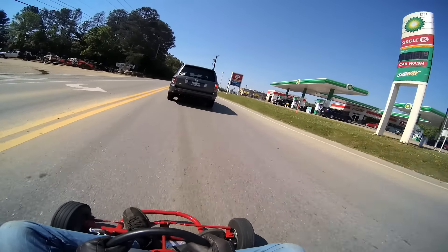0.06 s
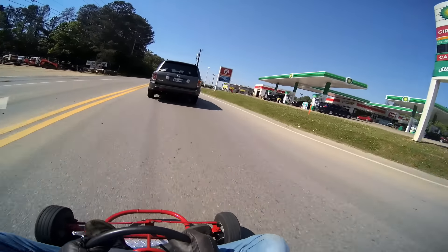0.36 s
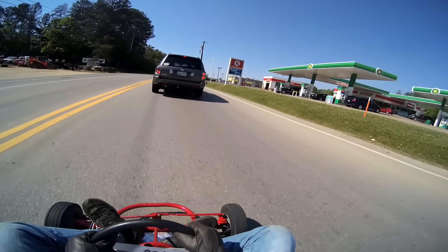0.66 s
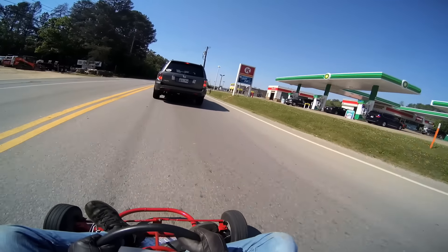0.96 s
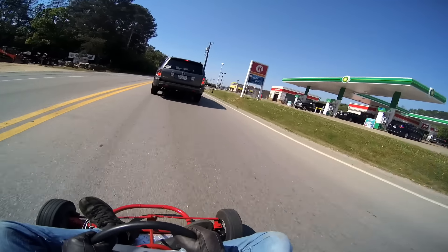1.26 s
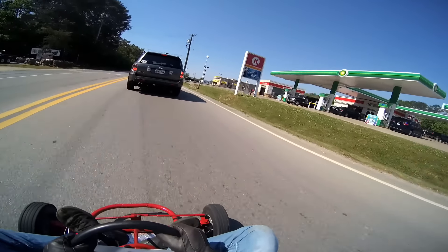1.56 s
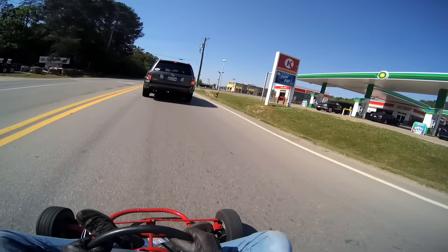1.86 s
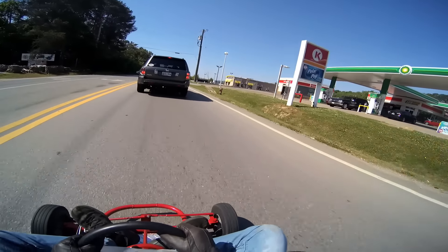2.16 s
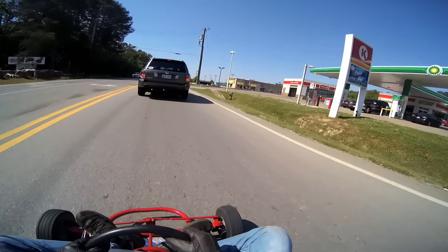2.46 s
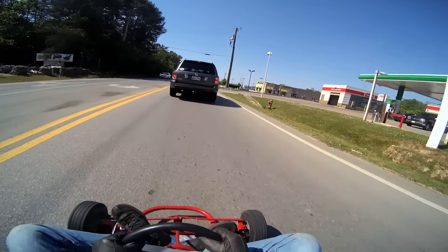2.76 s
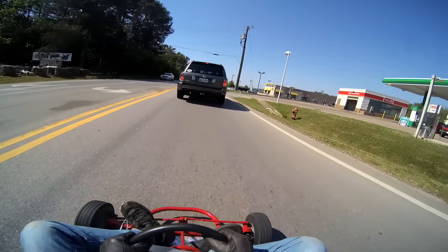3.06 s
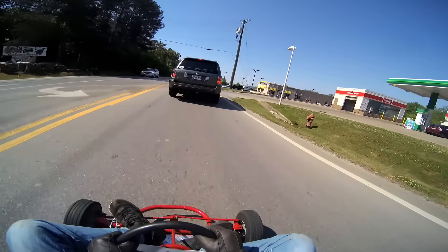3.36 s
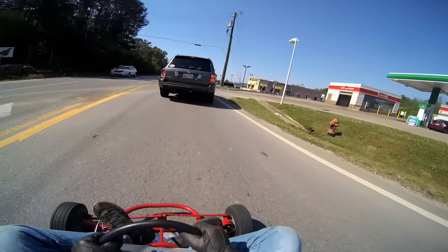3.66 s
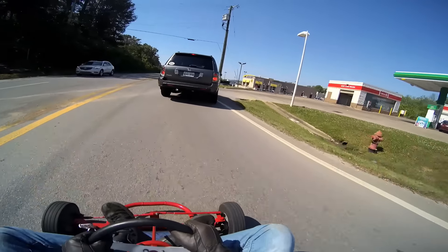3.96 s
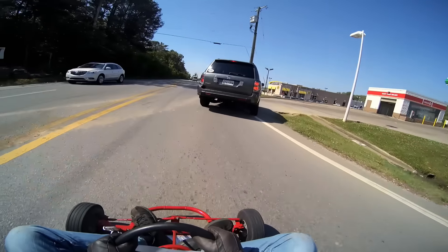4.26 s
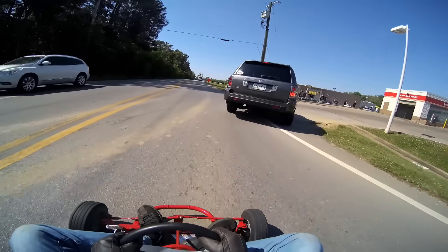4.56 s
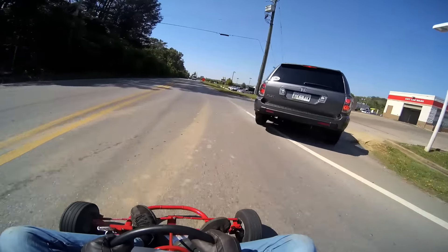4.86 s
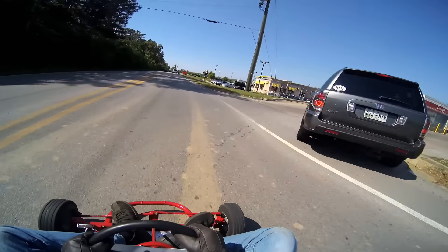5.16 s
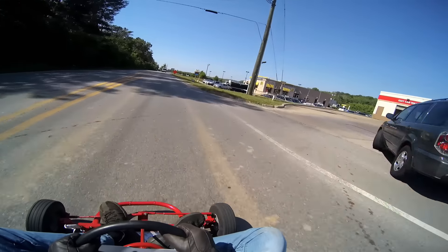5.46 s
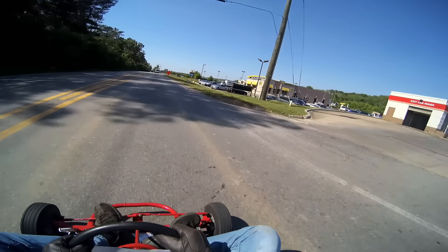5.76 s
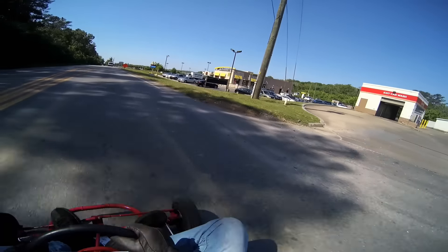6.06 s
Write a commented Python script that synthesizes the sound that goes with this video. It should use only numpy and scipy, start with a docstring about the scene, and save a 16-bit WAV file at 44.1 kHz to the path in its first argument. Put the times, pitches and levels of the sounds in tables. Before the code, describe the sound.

Heard from the driver's seat, a single-cylinder go-kart slows, sputtering and clattering, then opens up into a hard, hissing putter.

```python
"""The exhaust of a single-cylinder four-stroke go-kart, heard from a plastic case worn by the driver.
Coasting with the throttle shut, the revs sink and stray charges pop unevenly in the muffler. The drive
rattles as it takes up load; then every firing sends a pressure front and a bark of gas down the pipe.
Engine clatter, gear whine, the hiss of intake, chain and tyres, a low hum and a little wind run beneath.
Spectral peaks and dips colour the cracks and rushing noises, which reach two microphone ports."""
import sys
import numpy as np
from scipy import signal
from scipy.fft import rfft, irfft
from scipy.io import wavfile

SR = 44100
rng = np.random.default_rng(int(sys.argv[2]) if len(sys.argv) > 2 else 0)


def master(y):
    """Save y as 16-bit WAV."""
    cut = np.clip(np.atleast_2d(y).T, -1, 1)
    pcm = np.round(cut * 32767)  # scale
    wavfile.write(sys.argv[1], SR, pcm.astype(np.int16))


N = 269010
TIME = np.arange(N) / SR
CRUISE_HZ, CUTOFF_HZ = 20, 15300
CLUTCH_SLIPS_S, CLUTCH_BITES_S = 2.84, 4.05

# Engine speed, at two crank turns per firing: time_s, firing_rate_hz
FIRING_RATE = [(0.0, 25.608), (0.747, 24.031), (1.563, 20.607), (3.257, 16.983), (3.487, 15.762),
               (3.739, 16.191), (4.211, 19.534), (4.345, 21.701), (4.713, 21.356), (4.951, 21.528),
               (5.623, 21.116), (6.1, 22.42)]
# Throttle position: time_s, opening_fraction
THROTTLE_OPENING = [(0, .11), (4.1, .16), (4.23, .78), (4.38, 1), (4.6, .91), (4.95, 1)]
# Air drawn through the carburettor: time_s, strength_fraction
AIRFLOW = [(4.29, 0), (4.34, .68), (5.0, 1), (6.1, .15)]
# Level laws of exhaust, clatter, hiss and low throb:
# cruise_db, revs_db_per_octave, full_throttle_db, pulling_db_per_s, slack_loss_db
EXHAUST_LEVEL = (-42.5, 12, 8, 1.94, 14)
CLATTER_LEVEL = (-42, 6.5, 1.5, 2, 3)
HISS_LEVEL = (-51, 4, -4.5, 1.5, 6.5)
THROB_LEVEL = (-62, 10, 2.5, 3.5, 9)

# Firings that burn harder or softer than their neighbours: time_s, extra_db
UNEVEN_FIRINGS = [(4.237, 2), (4.286, 4), (4.333, 3), (4.426, 4), (4.472, -3), (4.658, -3), (4.751, 1.5),
                  (4.798, 2), (4.845, 2), (4.938, 4), (4.984, 4), (5.171, -1.5), (5.218, 5), (5.452, 2),
                  (5.548, -3), (5.595, 4), (5.689, 2.5), (5.828, 2.5), (5.92, -2), (6.011, 2)]
# The pressure front and its reflections in the pipe: delay_s, amplitude_ratio
PIPE_ECHOES = [(0, 0.68), (.0009, 0.24), (.0019, 0.23)]
# The uneven pops and thuds of the coasting engine, loud and faint:
# start_s, relative_bark_db, relative_boom_db, relative_thud_db
COASTING_POPS = [(0.013, -31, -38, -45), (0.131, -33, -47, -30.5), (0.174, -23, -68, -55),
                 (0.212, -27, -61, -55), (0.336, -25.5, -60, -55), (0.368, -30, -45, -30.5),
                 (0.409, -23, -55, -55), (0.451, -34, -61, -57), (0.534, -27, -55, -55),
                 (0.57, -23.5, -35.5, -31), (0.616, -27, -52, -50), (0.655, -24, -39, -32),
                 (0.785, -30, -34.5, -30), (0.83, -30, -54, -53), (0.867, -29, -59, -55),
                 (0.954, -26, -39, -38), (1.034, -22, -34, -30), (1.083, -26.5, -62, -55),
                 (1.122, -21.5, -37, -40), (1.172, -26.5, -47, -55), (1.22, -30, -44, -55),
                 (1.26, -39, -35, -39), (1.306, -23.5, -43, -50), (1.352, -25, -35.5, -33),
                 (1.445, -27, -31, -52), (1.501, -26, -46, -55), (1.542, -34, -35.5, -35),
                 (1.688, -38, -35, -55), (1.735, -27, -41, -55), (1.785, -30, -34, -45),
                 (1.886, -27, -35.5, -54), (1.988, -22, -35, -49), (2.041, -34, -36, -46),
                 (2.089, -28, -47, -52), (2.137, -31.5, -38, -52), (2.196, -31.5, -40, -52),
                 (2.249, -49, -41, -38), (2.301, -36, -43, -52), (2.404, -38, -39, -44),
                 (2.567, -36, -37, -34), (2.62, -55, -36, -52), (2.676, -47, -41.5, -54),
                 (2.787, -46, -39, -49), (2.844, -46, -37, -58), (2.898, -46, -38, -54),
                 (2.956, -32.5, -39, -57), (3.013, -34.5, -39, -59), (3.069, -49, -41, -51),
                 (3.185, -37, -37.5, -56), (3.243, -48, -49, -34.5), (3.301, -49, -53, -57),
                 (3.362, -36, -43, -44), (3.426, -34, -43, -64), (3.488, -32, -42, -55),
                 (3.551, -38, -47, -58), (3.617, -49, -41, -50), (3.68, -34, -54, -45),
                 (3.746, -55, -43, -43), (3.813, -37, -48, -42), (3.877, -39, -52, -36),
                 (3.945, -33, -49, -56), (4.01, -49, -56, -49), (4.075, -39, -44, -55),
                 (4.137, -31, -40, -61)]
# Hard knocks that set the engine's metal ringing: start_s, relative_level_db, pitch_hz
HARD_KNOCKS = [(0.059, -32.5, 867), (0.129, -34, 1040), (0.336, -29, 852), (0.37, -37, 1014),
               (0.457, -33, 884), (0.651, -37, 965), (0.829, -29, 863), (0.871, -30, 850), (1.0, -32, 854),
               (1.221, -30, 861), (1.348, -28, 875), (1.44, -29.5, 826), (1.501, -28, 860),
               (1.788, -35, 1000), (1.896, -31.5, 967), (1.993, -32, 960), (2.098, -32, 840),
               (2.201, -31.5, 840), (2.305, -35, 920), (2.786, -39, 940), (2.903, -36, 953)]
# Jerks of clutch and chain: start_s, relative_rattle_db, relative_tick_db
CLUTCH_JERKS = [(4.038, -37, -42), (4.049, -38, -55), (4.064, -27.5, -38), (4.074, -33, -50),
                (4.087, -29, -32), (4.125, -37, -42), (4.176, -43, -42), (4.185, -34, -45),
                (4.281, -45, -40)]

# Modes of the muffler, thin pipe wall and engine block: pitch_hz, relative_level_db, t60_s
MUFFLER_MODES = [(270, -34.5, 0.39), (300.2, -6, 0.12), (339, -14.5, 0.16), (415, -6, 0.067),
                 (4350, -14, 0.054)]
PIPE_WALL_MODES = [(1432, 1, 0.05), (2070, 1, 0.026), (2440, -5, 0.08), (3680, -1, 0.015)]
BLOCK_MODES = [(517, -5.5, 0.058), (856, -4, 0.15), (907, -4.5, 0.12), (1480, -28, 0.055)]
# Harmonics 1, 2, 3... of the firing rate: coasting_db, pulling_db, revs_db_per_octave, late_shift_db
ENGINE_ORDERS = [(-18, -24, 0, 6), (0, 1.5, 0, -10), (-17, 5, 0, 1.5), (-3, 4, -6, -3), (-9, -11, 0, -3),
                 (-13, -9, 0, -3), (-18, -9.5, 0, -6), (-9, -9, -8, -2)]

# Spectral shapes of the exhaust's sounds: frequency_hz, relative_level_db
CRACK_SPECTRUM = [(100, -6.0), (1000, 5.0), (4000, -21.0), (15000, 11.5)]
SPIT_SPECTRUM = [(1500, -33), (2800, -11), (3700, 7), (5500, -1.5), (8000, -19.5), (15000, -13)]
BLAST_SPECTRUM = [(100, -13), (250, -40), (430, -19.5), (700, 0.5), (1100, 2.5), (1500, 4.5), (2100, 2.5),
                  (2600, -2), (3700, -6), (5500, -12.5), (8000, -20), (15000, -22)]
RASP_SPECTRUM = [(1200, -45), (1750, -9), (2080, 9), (2450, -15), (3500, -20.5)]
PUFF_SPECTRUM = [(100, -17), (250, -27), (500, -22), (720, -3), (860, 15.5), (1150, -14.5), (1600, 5),
                 (2100, 6), (2600, -15.5), (4000, -22.5), (8000, -10.5), (15000, -26)]
BARK_SPECTRUM = [(100, -2), (350, -12.5), (650, 1.5), (880, 6), (1500, 9), (2400, 0.5), (4000, -8.5),
                 (8000, -15), (15000, -51)]
# Spectral shapes of the engine, drive and tyre noises: frequency_hz, relative_level_db
CLATTER_SPECTRUM = [(40, -10), (100, -11), (190, -14), (270, -16), (400, -5.5), (700, 4.5), (880, 3.5),
                    (1150, 5.5), (1700, 2), (2500, -5), (4000, -10.5), (6000, -16.5), (9000, -19),
                    (15000, -45)]
RATTLE_SPECTRUM = [(150, -35), (600, 5), (1000, 11), (1700, 4), (2500, -1), (3200, 4), (4000, -1),
                   (6000, -7), (10000, -14), (15000, -19)]
TICK_SPECTRUM = [(1500, -26), (3200, -6), (6000, 6), (9000, 3), (12000, -1), (15000, -2)]
INTAKE_SPECTRUM = [(300, -31), (3000, 3), (6000, 0), (8000, -2.5), (10000, 0.5), (12500, 3.5), (15000, 5.5)]
HISS_SPECTRUM = [(200, -20), (1500, -5), (4000, 1), (6000, 0), (9000, 1), (11000, 1), (13000, .5),
                 (15500, 1)]

# Peaks and dips that colour the sound, with a deep treble notch near 7 kHz: centre_hz, width_hz, gain_db
PEAKS_AND_DIPS = [(286.6, 99, 20), (544, 56, 7.5), (671, 56, -5.5), (1321, 137, -14.5), (1424, 144, 9),
                  (1871, 200, -8.5), (2130, 236, 5), (2263, 222, -12), (2450, 288, 14), (2900, 300, -8),
                  (3714, 676, 11), (4890, 140, -5.5), (5387, 390, 9.5), (7192, 274, -45), (8850, 190, 6.5),
                  (12270, 1400, -6.5), (14700, 800, -2)]
# Diffuse sound relative to the sound both ports share: frequency_hz, level_db
PORT_DIFFUSE = [(100, -45), (200, -56), (300, -33), (900, -23), (1500, -16), (1850, -1.5), (2450, -12.5),
                (3000, -2), (3700, -4.5), (5500, -11.5), (9000, -1), (15000, -2.5)]
# Level difference between the ports: frequency_hz, left_minus_right_db
PORT_BALANCE = [(500, 0.17), (1200, 0.5), (1500, -2.5), (2000, -6), (2450, -1.5), (3000, 0.5), (3700, 2),
                (4700, -3), (7000, 2.5), (9000, 2), (12000, -1), (15000, -0.5)]
# Phase difference between the ports: frequency_hz, left_lead_rad
PORT_PHASE = [(100, 0), (850, 0), (1100, -.1), (1750, 0), (1900, -1.3), (2200, -1.3), (2350, 0), (2750, 0),
              (3400, 2.7), (4000, 1.9), (5500, 2.4), (7500, 2.4), (9000, 1.7), (10300, .4), (12500, 1.7),
              (14800, .6)]


def exhaust(fired, throttle, air, exhaust_db):
    """Blowdown: the valve releases a steep front and a turbulent jet; with the throttle shut, a puff."""
    at = (fired * SR).astype(int)
    load = np.clip(throttle[at], .001, 1)
    chance = rng.standard_normal((len(at), 3))
    level_db = exhaust_db[at] + 1.5 * chance[:, 0]
    extra_db = sum(db * (abs(fired - s) < .02) for s, db in UNEVEN_FIRINGS)
    driven_db = level_db + extra_db + 20 * np.log10(load)
    front = pressure_front(fired, load ** 2 * from_db(level_db + 14 + .5 * extra_db))
    clang = strike(fired + .003, driven_db + 2.5, PIPE_WALL_MODES, scatter_db=2)
    crack = to_ports(front + clang, np.zeros(N), CRACK_SPECTRUM, depth=.4)
    muffler = strike(fired, -28.5 + 30 * np.log10(load), MUFFLER_MODES, scatter_db=1)
    # Envelopes of the gas noise; the blast rasps when much air is drawn.
    spit = swells(fired + .0011, driven_db + 5 + 1.3 * chance[:, 1], rise_s=.0006, decay_s=.0021)
    blast = swells(fired + .00036, driven_db + 10.5, rise_s=.0011, decay_s=.0046)
    puff = swells(fired, level_db + 2 + chance[:, 2], rise_s=.0026, decay_s=.006) * (1 - throttle)
    jet = rush(spit, SPIT_SPECTRUM) + rush(blast, BLAST_SPECTRUM)
    rasp = blast * air * from_db(-5 + 2.5 * drift(20))
    return crack + jet + rush(rasp, RASP_SPECTRUM) + rush(puff, PUFF_SPECTRUM) + muffler


def pressure_front(fired, heights, width_s=.0002):
    """Reflection in a duct: each steep pressure pulse is followed by its echoes in the pipe."""
    phase = (TIME[:SR // 200] - .00056) / width_s
    pulse = phase * np.exp(-phase ** 2 / 2)
    arrivals = sum(clicks(fired + delay_s, share * heights) for delay_s, share in PIPE_ECHOES)
    return np.convolve(arrivals, pulse)[:N]


def afterfire(extra_pops):
    """Cavity resonance: stray charges ignite in the muffler with a bark, a dull thud and a boom."""
    listed_pops = np.array(COASTING_POPS) + [0, -4.5, 0, -.5]
    start_s, bark_db, boom_db, thud_db = np.vstack([listed_pops, extra_pops]).T
    push = clicks(start_s, from_db(boom_db + 3.5))
    boom = no_bass(ring(push, hz=295, t60_s=.1) - ring(push, hz=338, t60_s=.035))
    thud = no_bass(ring(clicks(start_s, from_db(thud_db)), hz=419, t60_s=.029), corner_hz=131)
    bark = swells(start_s - .0015, bark_db, rise_s=.0012, decay_s=.006)
    return boom - thud + rush(bark, BARK_SPECTRUM)


def chance_pops(fired, rate, throttle, exhaust_db, cruise_share=.71, spread_db=2):
    """Chance ignition, likelier as the revs sink, gives rows of start_s, bark_db, boom_db, thud_db."""
    at = (fired * SR).astype(int)
    octaves_down = np.log2(CRUISE_HZ / rate[at])
    ignites = rng.random(len(at)) < cruise_share + octaves_down
    gap_to_listed_s = abs(fired[:, None] - np.array(COASTING_POPS)[:, 0]).min(axis=1)
    free = gap_to_listed_s > .5 / rate[at]
    scatter_db = spread_db * rng.standard_normal((len(at), 2))
    bark_db = exhaust_db[at] + 3.5 + scatter_db[:, 0]
    boom_db = -42.5 + 13 * octaves_down - 6 * drive_slack()[at] + scatter_db[:, 1]
    pops = np.transpose([fired + .0028, bark_db, boom_db, boom_db])
    return pops[ignites & free & (throttle[at] < .5)]


def clatter(cycle, throttle, clatter_db):
    """Dense impacts of valve gear, piston and chain merge into noise, modulated by the crank."""
    crank_turn = 1 + .052 * np.cos(4 * np.pi * (cycle + .1))
    power_stroke = 1 + .039 * throttle * np.cos(2 * np.pi * (cycle - .35))
    grain = from_db(clatter_db + 1 + 1.5 * drift(500))
    return rush(grain * crank_turn * power_stroke, CLATTER_SPECTRUM)


def piston_slap(fired, throttle, clatter_db):
    """Impact excitation: the piston rings the block at each crank turn, less as the throttle opens."""
    at = (fired * SR).astype(int)
    level_db = clatter_db[at] - 10 * throttle[at]
    between = (fired[1:] + fired[:-1]) / 2
    knocks = strike(fired + .00295, level_db, BLOCK_MODES, scatter_db=2)
    return knocks + strike(between, level_db[1:] - 4, BLOCK_MODES, scatter_db=3)


def pings():
    """Damped free vibration: each hard knock leaves a short metallic ring at a pitch of its own."""
    sound = 0
    for start_s, level_db, pitch_hz in HARD_KNOCKS:
        envelope = swells(np.array([start_s]), [level_db - 3], rise_s=.0013, decay_s=.017)
        sound += envelope * np.sin(2 * np.pi * pitch_hz * (TIME - start_s))
    return sound


def clutch_snatch(gain_db=-1.5):
    """Backlash: each jerk of the clutch gives a steel tick and rattles the slack chain, link by link."""
    start_s, rattle_db, tick_db = np.transpose(CLUTCH_JERKS)
    links = from_db(2 * drift(1200))
    rattle = links * swells(start_s, rattle_db + gain_db, rise_s=.001, decay_s=.012)
    tick = links * swells(start_s, tick_db + gain_db, rise_s=.0015, decay_s=.007)
    return rush(rattle, RATTLE_SPECTRUM, depth=.7) + rush(tick, TICK_SPECTRUM, depth=.6)


def intake(cycle, air):
    """Turbulence: air sizzles through the open carburettor, gulped once per cycle."""
    gulp = 1 + .25 * np.cos(2 * np.pi * (cycle - .28))
    return rush(from_db(-36 + 2.5 * drift(1500)) * air ** 2 * gulp, INTAKE_SPECTRUM)


def gear_whine(cycle, teeth=25, build_s=.55):
    """Periodic meshing: under load the crank gear sings at its tooth count times the crank speed."""
    loaded = np.clip((TIME - CLUTCH_BITES_S) / build_s, 0, 1) ** 2
    return from_db(-47 + 2 * drift(10)) * loaded * np.sin(2 * np.pi * 2 * teeth * cycle)


def rolling_hiss(cycle, air, hiss_db):
    """Modulated broadband noise: chain and tyres hiss, pulsing with the crank; intake air adds to it."""
    tug = 1 + .16 * np.cos(4 * np.pi * cycle)
    waver_db = 1.2 * drift(20)
    grain_db = 1.5 * drift(1300)
    return rush(from_db(hiss_db + 6 + 9 * air + grain_db + waver_db) * tug, HISS_SPECTRUM)


def throb_and_wind(cycle, rate, throttle, throb_db, shift_start_s=5.55, shift_length_s=.2):
    """A harmonic series on the firing rate hums while turbulent wind buffets the case."""
    crest = .072 + .12 * throttle
    octaves = np.log2(rate / CRUISE_HZ)
    # Late in the pull the second order gives way to the third.
    shift = np.clip((TIME - shift_start_s) / shift_length_s, 0, 1)
    hum = 0
    for order, (coast_db, pull_db, revs_db, shift_db) in enumerate(ENGINE_ORDERS, 1):
        waver_db = (1 - .6 * throttle) * drift(12)
        level_db = coast_db + (pull_db - coast_db) * throttle + revs_db * octaves + shift_db * shift
        hum += from_db(level_db + waver_db + 1.5) * np.cos(2 * np.pi * order * (cycle - crest))
    wind_band = signal.butter(2, [28, 140], "band", fs=SR, output="sos")
    wind = signal.sosfilt(wind_band, rng.standard_normal(N))
    gusts = from_db(-7.5 + 2 * drift(3.4))
    return from_db(throb_db) * (hum + gusts * wind / wind.std())


def source_level(law, rate, throttle):
    """Gains add in decibels: level follows revs, throttle, time spent pulling and slack in the drive."""
    cruise_db, revs_db, throttle_db, build_db, slack_db = law
    pulling_s = np.cumsum(throttle > .5) / SR
    steady_db = cruise_db + revs_db * np.log2(rate / CRUISE_HZ) + throttle_db * throttle
    return steady_db + build_db * pulling_s - slack_db * drive_slack()


def drive_slack(release_s=1, grab_s=.19):
    """Free play in the chain, 0-1: the clutch lets go gradually and grabs quickly."""
    released = np.clip((TIME - CLUTCH_SLIPS_S) / release_s, 0, 1)
    return released * np.clip(1 - (TIME - CLUTCH_BITES_S) / grab_s, 0, 1)


def to_ports(mid, side, spectrum, depth=1, size=4096):
    """Source and filter: a spectral shape plus peaks and dips, at unit power, feeds the two ports."""
    hz = np.arange(size // 2 + 1) * SR / size
    colour_db = sum(db / (1 + (2 * (hz - centre) / width) ** 2) for centre, width, db in PEAKS_AND_DIPS)
    # Folding the cepstrum gives a causal, minimum-phase response.
    cepstrum = irfft(np.log(from_db(at_hz(spectrum, hz) + depth * colour_db)))
    cepstrum[1:size // 2] *= 2
    cepstrum[size // 2 + 1:] = 0
    response = np.exp(rfft(cepstrum))
    response /= np.sqrt(np.mean(abs(response) ** 2 * (hz < CUTOFF_HZ)))
    left_right = np.array([[1], [-1]])
    diffuse = from_db(at_hz(PORT_DIFFUSE, hz))
    balance = from_db(.5 * left_right * at_hz(PORT_BALANCE, hz))
    phase = np.exp(.5j * left_right * at_hz(PORT_PHASE, hz))
    ports = response * balance * phase / np.hypot(1, diffuse)
    stereo, margin = 0, size // 16
    for sound, share in ((mid, 1), (side, left_right * diffuse)):
        kernel = np.roll(irfft(ports * share), margin, axis=1)
        stereo += signal.oaconvolve(sound[None], kernel, axes=1)[:, margin:margin + N]
    return stereo


def rush(envelope, spectrum, depth=1):
    """Random excitation: noise under an envelope is filtered; depth scales the peaks and dips."""
    mid, side = envelope * rng.standard_normal((2, N))
    return to_ports(mid, side, spectrum, depth)


def strike(times, level_db, modes, scatter_db):
    """Modal superposition: each blow rings every mode with a strength of its own."""
    chance_db = scatter_db * rng.standard_normal((len(times), len(modes)))
    return no_bass(sum(ring(clicks(times, from_db(level_db + mode_db + chance_db[:, k])), hz, t60_s)
                       for k, (hz, mode_db, t60_s) in enumerate(modes)))


def ring(force, hz, t60_s):
    """Damped oscillator: a unit impulse starts a decaying sine of amplitude 1."""
    radius, angle = from_db(-60 / (t60_s * SR)), 2 * np.pi * hz / SR
    return signal.lfilter([0, np.sin(angle)], [1, -2 * radius * np.cos(angle), radius ** 2], force + 1e-18)


def no_bass(sound, corner_hz=232):
    """Radiation efficiency: small cavities and plates emit little far below their modes."""
    return signal.sosfilt(signal.butter(4, corner_hz, "high", fs=SR, output="sos"), sound)


def swells(times, level_db, rise_s, decay_s):
    """Growth and exponential decay: the envelope of a series of bursts."""
    age = TIME[:SR // 8]
    shape = (1 - np.exp(-(age / rise_s) ** 2)) * np.exp(-age / decay_s)
    return signal.fftconvolve(clicks(times, from_db(level_db)), shape / shape.max())[:N]


def clicks(times, heights):
    """Impulse train: one click per event."""
    return np.bincount(np.clip(np.round(times * SR).astype(int), 0, N - 1), heights, N)


def drift(rate_hz):
    """Random modulation of unit variance, joining rate_hz chance values per second."""
    return np.interp(TIME * rate_hz, np.arange(N), rng.standard_normal(N)) * np.sqrt(3 / 2)


def in_time(curve):
    """Linear interpolation of a curve at every sample."""
    return np.interp(TIME, *np.transpose(curve))


def at_hz(spectrum, hz):
    """Interpolation of a spectrum on a log-frequency axis."""
    frequency_hz, value = np.transpose(spectrum)
    return np.interp(np.log(hz + 1), np.log(frequency_hz), value)


def from_db(db):
    """Amplitude ratio of a level in decibels."""
    return 10 ** (np.asarray(db) / 20)


def scene():
    """Superposition: one crank angle times the periodic sounds; revs and throttle set their levels."""
    rate, throttle, air = map(in_time, (FIRING_RATE, THROTTLE_OPENING, AIRFLOW))
    laws = EXHAUST_LEVEL, CLATTER_LEVEL, HISS_LEVEL, THROB_LEVEL
    exhaust_db, clatter_db, hiss_db, throb_db = (source_level(law, rate, throttle) for law in laws)
    cycle = np.cumsum(rate) / SR - .32  # the engine fires at each whole number
    fired = TIME[1:][np.diff(np.floor(cycle)) > 0]
    gas = exhaust(fired, throttle, air, exhaust_db)
    gas += afterfire(chance_pops(fired, rate, throttle, exhaust_db))
    metal = clatter(cycle, throttle, clatter_db) + piston_slap(fired, throttle, clatter_db)
    metal += pings() + gear_whine(cycle)
    hiss = rolling_hiss(cycle, air, hiss_db) + intake(cycle, air)
    return gas + metal + hiss + clutch_snatch() + throb_and_wind(cycle, rate, throttle, throb_db)


def record(dry):
    """Band limiting and saturation: deep rumble is rolled off, peaks are rounded and the top is cut."""
    headroom = .48  # share of full scale
    dry = signal.sosfilt(signal.butter(2, 15, "high", fs=SR, output="sos"), dry)
    rounded = headroom * np.tanh(dry / headroom)
    return signal.sosfilt(signal.ellip(10, .1, 80, CUTOFF_HZ, fs=SR, output="sos"), rounded)


dry = scene()
out = record(dry)
master(out)
```